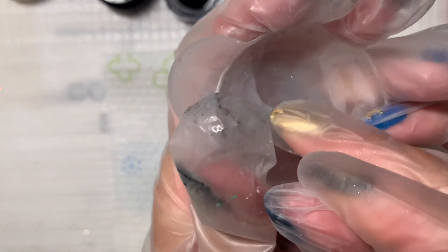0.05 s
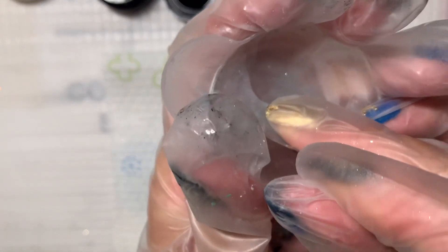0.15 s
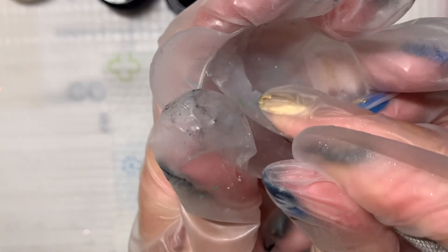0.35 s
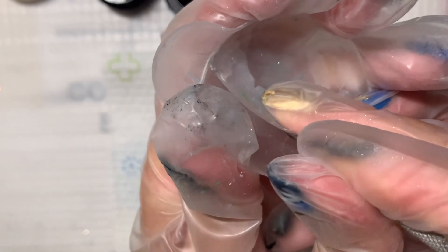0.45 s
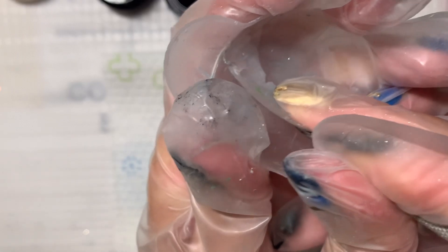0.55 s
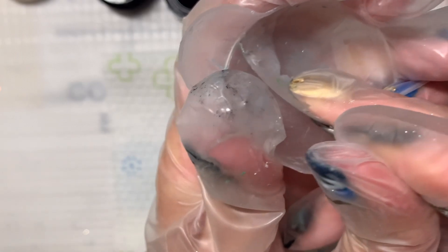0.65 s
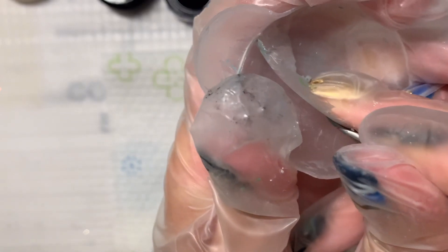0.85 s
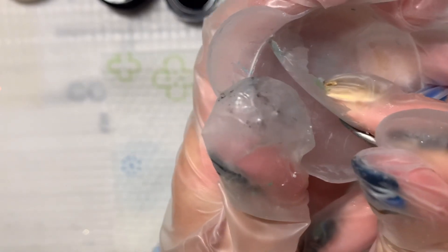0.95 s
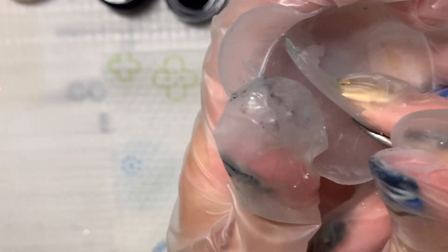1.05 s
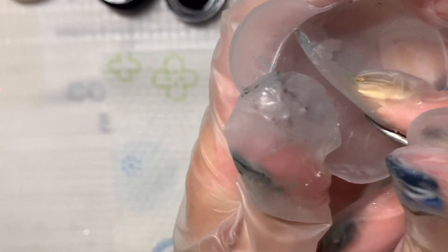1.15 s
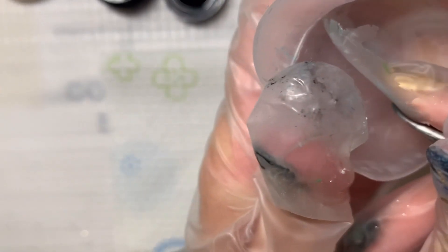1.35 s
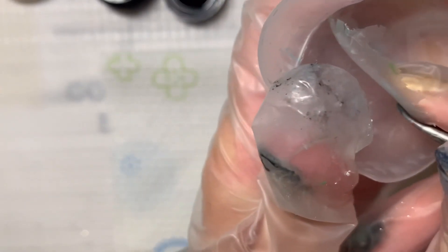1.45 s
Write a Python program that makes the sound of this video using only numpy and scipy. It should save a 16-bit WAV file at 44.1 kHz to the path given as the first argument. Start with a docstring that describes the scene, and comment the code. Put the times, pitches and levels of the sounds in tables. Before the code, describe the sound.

Cured resin piece peels from a soft rubber mould with two sharp snaps and scattered crackles

```python
"""A cured resin piece is peeled out of a soft mould, close to a two-port microphone in a quiet room.
A few small crackles come first; the edge lets go with two sharp snaps and a scrape, and more crackles
follow, with a few rounder pops and a faint rasp. Snaps, pops and crackles are short shaped clicks; scrape
and rasp are streams of tiny slips. Fingers knead the rubber softly, over a low rumble and a wavering hum."""
import sys
import numpy as np
from scipy import signal
from scipy.fft import rfft, irfft
from scipy.io import wavfile
from scipy.ndimage import uniform_filter1d

SR = 44100
rng = np.random.default_rng(int(sys.argv[2]) if len(sys.argv) > 2 else 0)


def unload_wav(signal):
    """Save mono or channel-first audio to the path in sys.argv[1] as 16-bit WAV at rate SR, clipped to [-1, 1]."""
    wavfile.write(
        sys.argv[1],
        SR,
        np.round(np.clip(np.atleast_2d(signal).T, -1, 1) * 32767).astype(np.int16),
    )


N = 66150  # samples: 1.5 s
TAPS = 1024  # samples in one click
CLICK_START_S = TAPS // 8 / SR  # each click begins this far into its own samples

# strength of the rasp over time, before its two parts are turned down: (time [s], level [dB])
RASP_LEVEL = [(.3, -83), (.5, -70.5), (.57, -85), (.62, -58), (.72, -79.5), (.77, -91), (.83, -64),
              (.87, -68), (.96, -91), (1.12, -80), (1.19, -60), (1.235, -47.5), (1.29, -81), (1.35, -64.5),
              (1.41, -82), (1.455, -47), (1.5, -77)]
# tone of the rasp, relative: (frequency [Hz], level [dB])
RASP_TONE = [(100, -26), (1400, -13), (2200, 6.5), (3000, 7), (4000, 1.5), (4600, -18), (7000, 2),
             (8400, -13), (9600, -6), (12600, -4), (13800, -14), (16000, -21.5)]


def amp(db):
    """Turns decibels into a gain."""
    return 10 ** (np.asarray(db) / 20)


def evened(x):
    """Scales to an rms (average strength) of 1."""
    return x / np.sqrt(np.mean(abs(x) ** 2) + 1e-20)


def read(points, hz):
    """Reads a table at any frequency, with straight lines over log frequency."""
    f, value = np.transpose(points)
    return np.interp(np.log(hz + 1), np.log(f + 1), value)


def level(points):
    """Gain at every sample from a curve of times and decibels."""
    return amp(np.interp(np.arange(N) / SR, *np.transpose(points)))


def add(mix, s, sound):
    """Mixes a sound in at its time, cutting off what runs past the end."""
    part = mix[max(round(s * SR), 0):][:len(sound)]
    part += sound[:len(part)]


def boost(x, hz, width_hz, db):
    """Adds a ringing resonance that lifts its own pitch by db."""
    ringing = signal.lfilter(*signal.iirpeak(hz, hz / width_hz, SR), x)
    return x + (amp(db) - 1) * ringing


def impulse(db):
    """The sharpest click with this spectrum that makes no sound before its start."""
    cepstrum = irfft(np.log(amp(db)))
    # folding the second half onto the first packs the energy at the start
    cepstrum[1:TAPS // 2] *= 2
    cepstrum[TAPS // 2 + 1:] = 0
    return irfft(np.exp(rfft(cepstrum)))


def release(bands_db, colour, ripple_db, spread_s, scatter_db, pocket_db=0):
    """One patch lets go: a short burst with its own damped resonances, air pocket and scatter."""
    # centres of the low, middle and treble levels [Hz]
    band_hz = [2700, 7200, 14250]
    pocket_hz, pocket_spread = 2980, 0.36  # middle pitch of the air pocket, and its relative spread
    scatter_s = 0.0028  # the mould and cupped hands scatter each click over about this time
    hz = np.fft.rfftfreq(TAPS, 1 / SR)
    t = np.arange(TAPS) / SR

    # smooth random bumps in the spectrum make every click different
    bumps = uniform_filter1d(rng.standard_normal(len(hz)), size=12)
    ripple = evened(uniform_filter1d(bumps, size=9))
    bands = read(list(zip(band_hz, bands_db)), hz)
    click = impulse(read(colour, hz) + bands + ripple_db * ripple)
    pitch_hz = pocket_hz * np.exp(pocket_spread * (2 * rng.random() - 1))
    click = boost(click, pitch_hz, width_hz=1220, db=pocket_db)

    # a tiny burst of noise smears the click; its spectrum is partly flattened to keep the tone
    tear = rfft(rng.standard_normal(TAPS) * np.exp(-t / spread_s))
    power = abs(tear) ** 2
    tear /= np.sqrt(power + np.mean(power) / 20)
    scatter = rfft(rng.standard_normal(TAPS) * np.sqrt(t) * np.exp(-t / scatter_s))
    smear = evened(tear) + amp(scatter_db) * evened(scatter)
    return np.roll(irfft(rfft(click) * smear), TAPS // 8)


def friction(curve, colour, per_s, spread_db):
    """Tiny random slips of uneven size, each ringing the mould."""
    size = amp(spread_db * np.minimum(rng.exponential(1, N), 3))
    signed_size = size * rng.choice([-1, 1], N)
    slips = signed_size * (rng.random(N) < per_s / SR)
    ring = impulse(read(colour, np.fft.rfftfreq(TAPS, 1 / SR)))
    return level(curve) * evened(signal.fftconvolve(slips, ring)[:N])


def rumble():
    """Random noise, mostly low with a little hiss, partly alike at the two ports."""
    # tone of the rumble, relative: (frequency [Hz], level [dB per Hz])
    rumble_tone = [(12, -18), (31, 1.7), (42, -7), (66, 1), (88, -6), (125, -11), (175, -14), (250, -26),
                   (620, -38), (1400, -44), (3000, -40), (5500, -49), (15000, -57)]
    # how alike left and right are: (frequency [Hz], likeness [0-1])
    rumble_same = [(60, 0.91), (140, 1), (300, 0.17), (1000, 0.069), (8000, 0.11)]
    hz = np.fft.rfftfreq(N, 1 / SR)
    left, other = rfft(rng.standard_normal((2, N)))
    same = np.clip(read(rumble_same, hz), 0, 1)
    right = same * left + np.sqrt(1 - same ** 2) * other
    return evened(irfft(np.array([left, right]) * amp(read(rumble_tone, hz)), N))


def hum(hz, waver_hz):
    """A sine wave whose pitch wanders slowly and whose strength comes and goes."""
    # rms strength of the hum, before the left-right balance: (time [s], level [dB])
    hum_level = [(0, -57.5), (.6, -58.5), (.69, -53.5), (.83, -51.5), (.97, -60), (1.09, -50.5),
                 (1.25, -58.5)]
    drift_hz = np.fft.rfftfreq(N, 1 / SR)
    slow = (drift_hz < 12) * (drift_hz > 0)
    drift = evened(irfft(rfft(rng.standard_normal(N)) * slow, N))
    phase = 2 * np.pi * np.cumsum(hz + waver_hz * drift) / SR
    return np.sqrt(2) * level(hum_level) * np.sin(phase)


def background():
    """Room rumble and hum together, a little stronger at the right port."""
    rumble_db, right_db = -53, 2  # rumble before balance; right port above left
    both = amp(rumble_db) * rumble() + hum(hz=103.3, waver_hz=2.76)
    return both * amp([[-right_db / 2], [right_db / 2]])


def room(x, early_db, early_s, tail_db):
    """Quick reflections from the table, then a short tail; both differ at each port."""
    # time the tail takes to fall by 60 dB: (frequency [Hz], time [s])
    room_t60 = [(500, 0.21), (3000, 0.086), (9000, 0.022), (16000, 0.055)]
    t = np.arange(SR // 2) / SR
    early, late = rng.standard_normal((2, 2, len(t))) * (t > .001)
    early = early * np.exp(-(t / early_s) ** 2)
    # each pitch of the tail fades at its own speed
    hz, at, z = signal.stft(late, SR, nperseg=256)
    fade = amp(-60 * at / read(room_t60, hz)[:, None])
    tail = signal.istft(z * fade, SR, nperseg=256)[1][:, :len(t)]
    echo = amp(early_db) * early / np.linalg.norm(early[0])
    echo = echo + amp(tail_db) * tail / np.linalg.norm(tail[0])
    return signal.fftconvolve(x[None], echo, axes=1)[:, :N]


def ports(x):
    """The sound reaches the left port first; the right one has a resonance of its own."""
    # how far the right port lags the left: (frequency [Hz], lag [radians])
    port_lag = [(700, 8), (1900, .5), (2840, 1.65), (3960, 1.76), (5200, 3.5), (6720, 5), (8010, 7),
                (10000, 9.5), (12400, 12.5), (15500, 17)]
    # right port against the left: (frequency [Hz], level [dB])
    port_level = [(500, 10.5), (1300, 6), (2100, 0.5), (2800, 8.5), (3800, 0.5), (8000, 0)]
    hz = np.fft.rfftfreq(2 * N, 1 / SR)
    right = amp(read(port_level, hz)) * np.exp(-1j * read(port_lag, hz))
    # the pair shares the same mean power at every pitch
    pair = np.array([np.ones(len(hz)), right]) / np.sqrt((1 + abs(right) ** 2) / 2)
    return irfft(rfft(x, 2 * N) * pair)[:, :N]


def handling():
    """The fingers knead the rubber: soft, dull friction, drawn separately for each port."""
    # strength of the kneading: (time [s], level [dB])
    handling_level = [(0, -66), (.3, -80), (.55, -83), (.62, -73), (.9, -70), (1.27, -83.5), (1.38, -73)]
    # tone of the kneading, relative: (frequency [Hz], level [dB])
    handling_tone = [(200, -8.5), (350, 5), (600, -11), (1500, -13.5), (6000, -48)]
    return np.array([friction(handling_level, handling_tone, per_s=600, spread_db=3) for port in range(2)])


def stick_slip(spread_db):
    """The peeling front catches and jumps at an uneven rate, each jump a small click."""
    slips_per_s, jitter = 230, 0.29  # typical rate, and relative spread of the gaps
    draws = rng.standard_normal(size=(600, 2))
    times = np.cumsum(np.exp(jitter * draws[:, 0])) / slips_per_s
    sizes = np.clip(draws[:, 1], -2, 2)
    out = np.zeros(N)
    for s, size in zip(times, sizes):
        jump = release([0, 0, 0], RASP_TONE, ripple_db=4.0, spread_s=0.0001, scatter_db=-13)
        add(out, s, amp(spread_db * size) * jump)
    return level(RASP_LEVEL) * evened(out)


def rasp():
    """The jumps of the peeling front, with finer slips between them."""
    slip_db, fizz_db = -1.5, -7.5
    fizz = friction(RASP_LEVEL, RASP_TONE, per_s=1400, spread_db=4.5)
    return amp(slip_db) * stick_slip(spread_db=1.5) + amp(fizz_db) * fizz


def scrape():
    """The resin edge scrapes along the rubber in a stream of tiny slips."""
    # strength of the scrape, before the rings: (time [s], level [dB])
    scrape_level = [(.05, -75), (.115, -62), (.145, -81), (.198, -42.5), (.215, -53), (.23, -48),
                    (.278, -55), (.29, -45.5), (.31, -74), (.35, -99)]
    # tone of the scrape, relative: (frequency [Hz], level [dB])
    scrape_tone = [(700, -12), (1450, -8), (2300, 0.5), (4200, 4.5), (5800, -7.5), (7500, 0), (8900, 7),
                   (11500, -1), (15500, -18.5), (16500, -35)]
    return friction(scrape_level, scrape_tone, per_s=750, spread_db=3)


def crackle(bands):
    """One small patch unsticks: a click with a slight, broad air-pocket resonance and a little scatter."""
    # tone shared by all crackles, relative: (frequency [Hz], level [dB])
    crackle_tone = [(100, -36), (1550, -12), (2150, 5), (3000, 8.5), (4500, 4.5), (7000, -1.5),
                    (8200, -2.5), (11000, 1.5), (15500, -1), (16700, -21)]
    gain = amp(22.5)
    return gain * release(bands, crackle_tone, ripple_db=2, spread_s=0.00016, scatter_db=-14, pocket_db=3)


def crackles():
    """Many small patches unstick one after another."""
    # small patches, levels relative: (time [s], low [dB], middle [dB], treble [dB])
    patches = [(0.0626, -51, -41.5, -44), (0.1204, -58.5, -50, -46.5), (0.1602, -63, -45, -48),
               (0.1659, -51, -57, -75), (0.1821, -53, -40, -56), (0.221, -61, -44, -34),
               (0.2691, -76, -40, -37), (0.2834, -61, -46, -50), (0.2859, -54, -39, -41),
               (0.3413, -54, -58.5, -47.5), (0.3551, -58.5, -59, -57), (0.3628, -56, -55, -54),
               (0.374, -50, -50, -55), (0.394, -51, -61, -51), (0.4055, -48.5, -43.5, -46),
               (0.4154, -55, -65, -49), (0.4391, -53.5, -64, -55), (0.4675, -54, -57, -48),
               (0.4785, -53.5, -57.5, -64), (0.4901, -54, -71, -70), (0.501, -48, -43, -41.5),
               (0.5252, -52, -53, -45.5), (0.536, -67, -61, -54), (0.542, -56, -64, -61),
               (0.6087, -61, -70, -60), (0.6404, -47.5, -67, -52), (0.6629, -48, -55.5, -48.5),
               (.6757, -52, -61, -62), (.6874, -47.5, -64.5, -46), (.7084, -46, -54, -49),
               (0.713, -45, -75, -62), (0.7232, -49.5, -69, -52), (0.7322, -53, -51, -47),
               (.738, -49, -53, -41), (0.7553, -48.5, -54.5, -40.5), (0.7867, -46.5, -55, -51),
               (0.8004, -49.5, -62, -39.5), (0.81, -52, -62, -45), (0.8179, -47.5, -54, -48),
               (0.8257, -45.5, -55, -41), (.832, -48, -59, -35), (0.8965, -48, -47.5, -41.5),
               (0.913, -46, -55, -46.5), (0.9284, -48, -61, -57), (.9778, -46, -54.5, -70),
               (1.0085, -45.5, -53, -51), (1.0589, -48, -48, -48), (1.1207, -47.5, -80, -50),
               (1.1242, -67, -53, -55), (1.156, -62, -58, -52), (1.1596, -46.5, -44, -64),
               (1.1798, -56, -49, -43), (1.1891, -52, -55, -52), (1.1968, -73, -44, -72),
               (1.2061, -72, -47, -67), (1.2318, -52.5, -66, -71), (1.2417, -53, -48, -62),
               (1.2618, -54, -52.5, -65), (1.2748, -54, -60, -62), (1.3032, -56, -52.5, -59),
               (1.3141, -53, -54, -57), (1.323, -51, -57, -61), (1.3313, -48.5, -59, -63),
               (1.3404, -50.5, -51, -55), (1.348, -43, -56.5, -56), (1.3559, -54, -58, -64),
               (1.3645, -48, -59, -57), (1.3794, -66, -40, -60), (1.3832, -40, -51.5, -51),
               (1.4264, -43.5, -56, -54), (1.4407, -54, -52, -60), (1.446, -62, -38.5, -53),
               (1.4499, -56, -59, -59), (1.4566, -64, -40, -53), (1.4709, -45, -64, -61),
               (1.486, -46, -45.5, -46)]
    out = np.zeros(N)
    for s, *bands in patches:
        add(out, s - CLICK_START_S, crackle(bands))
    return out


def pops():
    """Pockets of rubber come away with rounder clicks, a small tick just ahead of each."""
    # pockets, levels relative: (time [s], low [dB], middle [dB], treble [dB])
    pockets = [(0.5984, -36, -43.5, -42), (0.8436, -33, -49, -45), (1.0351, -31, -43.5, -41.5),
               (1.1324, -35.5, -41.5, -36.5)]
    # tone shared by all pops, relative: (frequency [Hz], level [dB])
    pop_tone = [(100, -32), (1550, -14.5), (2150, 7), (3000, 11), (4000, 2.5), (5500, 1), (7200, 3.5),
                (8500, -4), (11000, 1.5), (15000, 4), (16500, -23)]
    pop_db, lead_s, lead_db = 20.5, 0.0014, -14.5  # pop gain; tick's head start and level offset
    out = np.zeros(N)
    for s, low, middle, treble in pockets:
        pop = release([low, middle, treble], pop_tone, ripple_db=3.14, spread_s=.00007, scatter_db=-22)
        add(out, s - CLICK_START_S, amp(pop_db) * pop)
        tick = crackle([middle + lead_db] * 3)
        add(out, s - lead_s - CLICK_START_S, tick)
    return out


def snaps():
    """The edge breaks free in two sharp clicks, each with its own tone."""
    # breaks, levels relative: (time [s], low [dB], middle [dB], treble [dB])
    breaks = [(0.2001, -33.5, -23.5, -24.5), (0.2482, -30, -25, -14.5)]
    # one relative tone for each snap: (frequency [Hz], level [dB])
    snap_tones = [
        [(600, -24), (950, -0.5), (1300, -0.5), (1700, 3), (2300, 12.5), (3300, -5), (4400, 8.5), (6000, 1),
         (7000, -7), (9000, -2.5), (10500, -3), (12500, 6.5), (16000, -9)],
        [(600, -22), (1000, -7.5), (1300, 1), (1700, 0.5), (2300, 6), (3300, 0), (4300, 13), (5400, -8),
         (6800, -18), (8800, -1.5), (10500, -10), (12500, -1.5), (16000, -19)],
    ]
    out = np.zeros(N)
    for (s, *bands), tone in zip(breaks, snap_tones):
        snap = release(bands, tone, ripple_db=3.0, spread_s=0.00013, scatter_db=-23)
        add(out, s - CLICK_START_S, amp(22.5) * snap)
    return out


def scene():
    """The peeling mould in the hands, in the room."""
    # narrow rings that colour the peeling: (frequency [Hz], width [Hz], boost [dB]); 0 dB adds nothing
    rings = [(6980, 470, 3.5), (9530, 980, 3.5), (15500, 1200, 0)]
    peel = snaps() + pops() + crackles() + rasp() + scrape()
    for ring in rings:
        peel = boost(peel, *ring)
    echoes = room(peel, early_db=-12, early_s=0.01, tail_db=-12.5)
    return ports(peel) + echoes + handling() + background()


def record(dry):
    """A steep filter takes away everything well above 16.8 kHz."""
    low_pass = signal.firwin(255, 16800, window=("kaiser", 8), fs=SR)
    return signal.oaconvolve(dry, low_pass[None], "same")


dry = scene()
out = record(dry)
unload_wav(out)
```